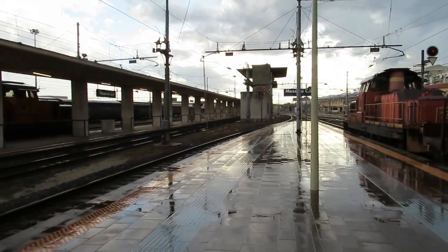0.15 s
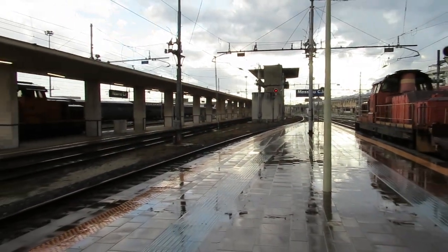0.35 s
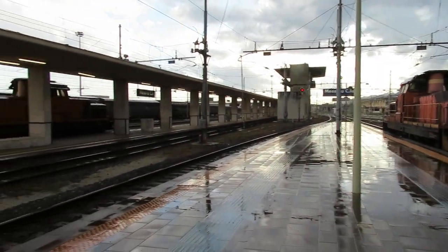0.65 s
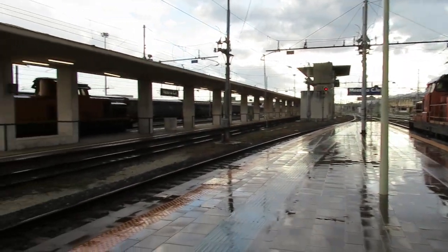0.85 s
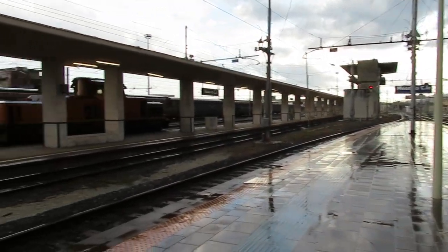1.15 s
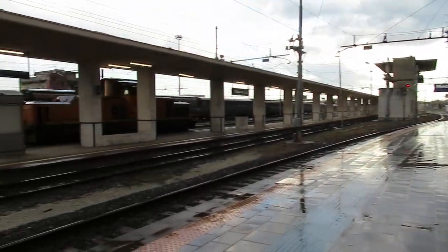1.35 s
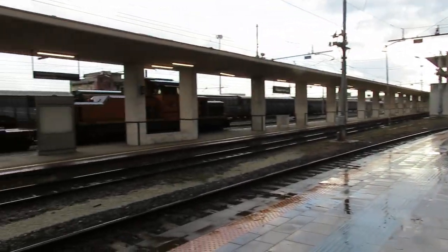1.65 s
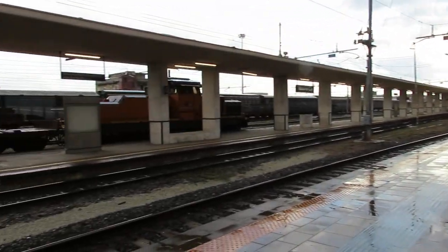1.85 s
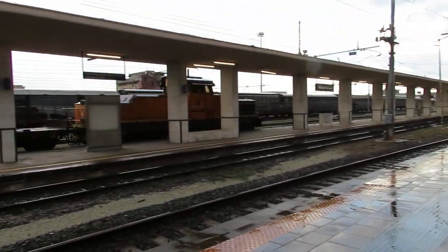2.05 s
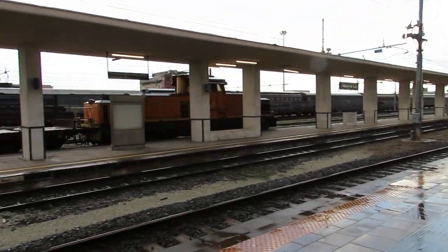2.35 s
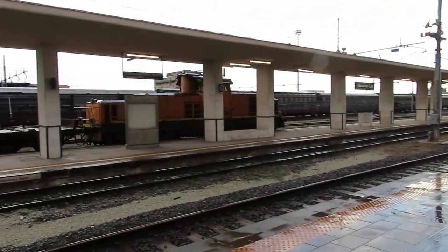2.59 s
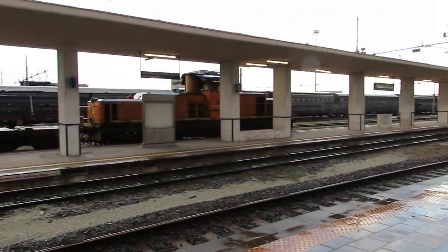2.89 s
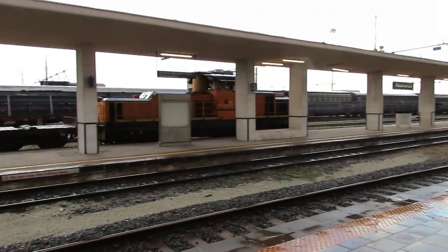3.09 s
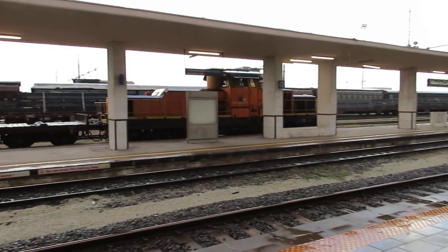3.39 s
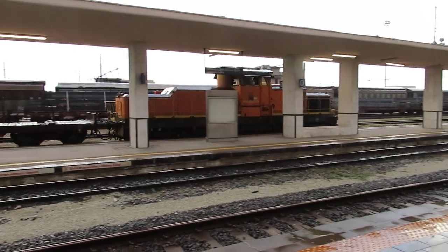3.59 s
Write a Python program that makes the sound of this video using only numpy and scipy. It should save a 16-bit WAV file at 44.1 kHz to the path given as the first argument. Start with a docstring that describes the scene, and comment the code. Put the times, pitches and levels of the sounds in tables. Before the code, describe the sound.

Heard in stereo from a station platform, a slow diesel locomotive rumbles steadily, with faint wheel squeaks, a light clink and a couple of rail thuds. After a second, a bright hiss of air starts, whistles faintly and dies down.

```python
"""A station platform, heard on two closely spaced microphones as a diesel shunter rolls slowly past
behind the pillars. Its exhaust drones on low orders of the engine cycle, over a broad roar and thin
gear and fan whines. A wheel squeals faintly, a coupling clinks, wheels thud over a rail joint.
About a second in, a valve opens and compressed air hisses out, whistles faintly and fades."""
import sys
import numpy as np
from scipy import signal
from scipy.fft import rfft, irfft, next_fast_len
from scipy.io import wavfile

SR = 44100
rng = np.random.default_rng(int(sys.argv[2]) if len(sys.argv) > 2 else 0)


def wrap_up_sound(samples):
    """Save the sound to the file named by the first command line argument, as 16-bit audio."""
    columns = np.atleast_2d(samples).T
    # keep every value between -1 and 1, then stretch to whole-number steps
    tamed = np.clip(columns, -1, 1)
    steps = np.round(tamed * 32767).astype(np.int16)
    wavfile.write(sys.argv[1], SR, steps)


N = 164493

CYCLE_HZ = 9.47   # engine cycles a second
VALVE_OPENS_S, VALVE_ATTACK_S = 1.062, 0.0079

# Short high chirps: wheel squeals near 5.2 kHz and whistles of escaping air near 6.2 kHz.
# Each row: start in seconds, length in seconds, centre pitch in Hz, level in dB.
CHIRPS = [(.02, .19, 5270, -48), (.33, .16, 5290, -51), (.74, .12, 5240, -47), (1.09, .06, 5120, -43),
          (1.22, .06, 5300, -43), (1.37, .06, 5320, -42), (1.06, .13, 6330, -45), (1.33, .1, 6170, -43),
          (1.5, .11, 6240, -43), (1.66, .11, 6230, -43)]
# The coupling's modes. Each row: pitch in Hz, relative level in dB, seconds to die by 60 dB.
COUPLING_MODES = [(5060, -1, .1), (5750, -6, .12), (5785, -1, .17)]
# Wheels over a rail joint. Each row: time in seconds, level in dB, pitch in Hz.
JOINT_THUDS = [(.345, -9.5, 311), (2.762, -13, 243)]

# The escaping air. Each row: time in seconds, relative level in dB, lift of the top octave in dB.
AIR_FLOW = [(1.08, -36, 4), (1.15, -35.5, 1), (1.19, -39.5, 4), (1.26, -38, 0), (1.38, -36, 2.5),
            (1.55, -36, 2), (1.7, -38, -3), (1.82, -35.5, 1.5), (1.92, -39, 8), (2.02, -33, 1.5),
            (2.08, -39.5, 7.5), (2.16, -33.5, -4), (2.25, -41.5, 7), (2.36, -37.5, 3), (2.45, -40, 6.5),
            (2.52, -45.5, 10), (2.54, -37, -1), (2.75, -42, 2.5), (2.9, -45, 3.5), (3.05, -48, 7),
            (3.2, -47.5, 5), (3.25, -51, 3), (3.33, -48.5, 3), (3.5, -42, -6), (3.73, -52, -1)]
# The hiss in the pair's mid (sum) and side (difference). Each row: frequency in Hz, relative level in dB.
AIR_MID = [(1470, -1.5), (2500, -7), (3020, -2), (3270, -5), (4420, -1), (6150, -0.5), (7530, 0),
           (11100, -7), (12500, -30.5), (13800, -46), (15000, -44)]
AIR_SIDE = [(1470, -39), (2500, -13), (3070, -9), (3370, -10), (4470, -12), (6170, -4), (10100, -1.5),
            (11300, 2), (13600, -2), (15600, -11)]
# How the hiss's side follows its mid. Each row: frequency in Hz, share from 0 to 1, phase in radians.
AIR_COHERENCE = [(2500, .3, 3.4), (4500, .4, 4.4), (6500, .8, 4.45), (10000, .7, 4.6), (13000, .1, 4.6)]
# Whistle in the jet. Each row: pitch in Hz, width in Hz, level against the hiss in dB.
AIR_WHISTLES = [(6330, 60, -20)]

# Gear and fan whines. Each row: first and last pitch in Hz, wander in Hz, first and last level in dB.
WHINES = [(395, 397, 3, -41, -41), (1087, 1087, 6, -41, -48), (1451, 1436, 1, -46.5, -44),
          (1474, 1478, 3, -54, -51)]
# The roar as the pillars shade it. Each row: time in seconds, relative bass and middle levels in dB.
ROAR_SHADING = [(0, -25, -27), (0.3, -25.5, -29), (0.6, -22.5, -27.5), (0.9, -19, -26.5),
                (1.2, -24.5, -28.5), (1.5, -22.5, -27), (1.75, -20, -28.5), (2, -22, -25.5),
                (2.2, -20, -27), (2.3, -19.5, -24.5), (2.4, -20.5, -26), (2.55, -21, -25.5),
                (2.7, -23.5, -24), (2.77, -17.5, -28), (2.84, -22, -26.5), (2.95, -22, -28),
                (3.2, -22.5, -29), (3.45, -22.5, -28), (3.73, -21.5, -28)]
# The roar's treble. Each row: time in seconds, relative level in dB.
ROAR_TREBLE = [(0.0, -32), (0.01, -32), (0.25, -31.5), (0.29, -35.5), (0.46, -32.5), (1.01, -33),
               (1.15, -30.5), (1.16, -32.5), (1.34, -33), (1.39, -30.5), (1.53, -35), (1.57, -29),
               (1.59, -35.5), (1.8, -34), (1.93, -29.5), (2.23, -32.5), (2.27, -30), (2.38, -30),
               (2.51, -32.5), (2.54, -30.5), (2.74, -31.5), (2.78, -31), (3.12, -35), (3.2, -33),
               (3.24, -37.5), (3.27, -33.5), (3.73, -35)]
# The roar in the pair's mid and side. Each row: frequency in Hz, relative level in dB.
ROAR_MID = [(25, -48), (40, -25), (52, -13), (75, -13.5), (100, -15), (135, -15), (240, -11.5), (300, -17),
            (428, -24), (560, -21), (742, -25), (1000, -29.5), (1110, -27), (1740, -34.5), (2400, -36.5),
            (3100, -36.5), (4630, -42.5), (5250, -41), (8030, -50), (9800, -57), (11000, -80),
            (15600, -105)]
ROAR_SIDE = [(18, -49), (30, -15), (263, -2.5), (468, -4.5), (675, -14), (1030, -4.5), (1110, -9),
             (3240, -14), (5330, -16.5), (8310, -22), (13700, -20), (15600, -49)]
# How the roar's side follows its mid. Each row: frequency in Hz, share from 0 to 1, phase in radians.
ROAR_COHERENCE = [(100, 0.2, 1.5), (350, 0.6, 2.2), (700, 0.3, 3.3), (1100, 0.74, 3.2), (2000, 0, 4.2),
                  (7000, .3, 4.3), (12000, .1, 4.4)]

# The two strong exhaust orders, swelling and fading as direct sound and echo meet.
# Each row: time in seconds, level of order 6 in dB, level of order 9 in dB.
STRONG_ORDERS = [(0, -17.5, -25), (.15, -16, -25), (.7, -18, -27), (.95, -17.5, -24), (1.2, -19.5, -21.5),
                 (1.4, -23, -22), (1.55, -22, -20), (1.75, -22, -24), (1.9, -25, -18), (2.05, -29, -17.5),
                 (2.25, -26, -17.5), (2.5, -17.5, -20.5), (2.75, -17, -20.5), (2.9, -16, -25),
                 (3.1, -15, -26), (3.35, -16, -31), (3.6, -13, -27), (3.73, -13.5, -26)]
# The weaker exhaust orders. Each row: multiple of the engine cycle, level in dB.
WEAK_ORDERS = [(4, -42), (5, -34), (7, -32), (8, -28), (10, -34), (11, -28.5), (12, -36), (15, -32),
               (18, -35)]


def amp(db):
    return 10 ** (np.asarray(db) / 20)


def rms_one(x):
    return x / np.sqrt(np.mean(x ** 2) + 1e-20)


def in_time(rows):
    times, *columns = np.transpose(rows)
    return [np.interp(np.arange(N) / SR, times, column) for column in columns]


def at_hz(rows, hz):
    freqs, *columns = np.transpose(rows)
    return [np.interp(np.log(hz), np.log(freqs), column) for column in columns]


def drift(rate_hz):
    """Smooth random wander with a spread of 1."""
    step, settle = 40, 2000   # audio samples per point, points for the filter to settle
    pole = np.exp(-2 * np.pi * step * rate_hz / SR)
    white = rng.standard_normal(N // step + settle + 2)
    slow = signal.lfilter([1], [1, -2 * pole, pole * pole], white)[settle:]
    return np.interp(np.arange(N) / step, np.arange(len(slow)), rms_one(slow - slow.mean()))


def tone(hz, wander_hz, rate_hz):
    """A sine whose pitch wanders at random; rms 1."""
    return np.sqrt(2) * np.sin(2 * np.pi * np.cumsum(hz + wander_hz * drift(rate_hz)) / SR)


def ring(start_s, hz, t60_s, attack_s=.002):
    """One struck mode: a dying sine."""
    age = np.maximum(np.arange(N) / SR - start_s, 0)
    return np.sin(2 * np.pi * hz * age) * amp(-60 * age / t60_s) * np.minimum(age / attack_s, 1)


def narrow_noise(hz, width_hz):
    """A thin band of noise around a pitch; rms 1."""
    phase = 2 * np.pi * np.cumsum(np.full(N, hz)) / SR
    return rms_one(drift(width_hz / 2) * np.cos(phase) + drift(width_hz / 2) * np.sin(phase))


def pair_noise(mid_colour, side_colour, coherence, band_db, side_db):
    """Noise at the two microphones, mid at rms 1; each octave follows band_db(hz) and wavers alone."""
    edges = 20 * 2. ** np.arange(11)
    white = rng.standard_normal((2, 2, N))
    noises = 0
    for k, (low, high) in enumerate(zip(edges, edges[1:])):
        octave = signal.butter(2, [low, high], "band", fs=SR, output="sos")
        level_db = band_db(np.sqrt(low * high)) + .8 * drift(10)
        noises = noises + amp(level_db) * signal.sosfilt(octave, white[k % 2])
    size = next_fast_len(N)
    common, separate = rfft(noises, size)
    hz = np.maximum(np.arange(len(common)) * SR / size, 1)
    share, phase = at_hz(coherence, hz)
    difference = share * np.exp(1j * phase) * common + np.sqrt(1 - share ** 2) * separate
    low_cut = np.minimum(hz / mid_colour[0][0], 1) ** 2
    mid = irfft(low_cut * amp(at_hz(mid_colour, hz)[0]) * common, size)[:N]
    side = irfft(low_cut * amp(at_hz(side_colour, hz)[0]) * difference, size)[:N]
    return rms_one(mid) + amp(side_db) * rms_one(side) * [[1], [-1]]


def arch(start_s, length_s):
    """A half-sine swell from silence to silence."""
    return np.sin(np.pi * np.clip((np.arange(N) / SR - start_s) / length_s, 0, 1))


def throb_db(order, depth):
    """A level that pulses `order` times per engine cycle."""
    return 20 * np.log10(1 + depth * np.sin(2 * np.pi * order * CYCLE_HZ * np.arange(N) / SR))


def high_hiss_burst(start_s=1.062, attack_s=.0079, hold_s=.2, fade_s=.1):
    """A short burst of very high hiss, about a second in."""
    age = np.arange(N) / SR - start_s
    band = signal.butter(4, (12800, 14600), "band", fs=SR, output="sos")
    hiss = rms_one(signal.sosfilt(band, rng.standard_normal(N)))
    envelope = np.clip(np.minimum(age / attack_s, 1 - (age - hold_s) / fade_s), 0, 1)
    return amp(-45) * envelope * hiss


def high_chirps(rise_hz_per_s=400):
    """Wheel squeals and whistles of escaping air: short, flickering notes that slide upward."""
    chirps = 0
    for start_s, length_s, hz, db in CHIRPS:
        level = amp(db + 5 * drift(40)) * arch(start_s, length_s) ** .5
        pitch = hz + rise_hz_per_s * (np.arange(N) / SR - start_s - length_s / 2)
        chirps += level * tone(pitch, wander_hz=55, rate_hz=30)
    return chirps


def brief_sounds(clink_s=.241, clink_db=-31.5):
    """Chirps, a coupling's clink and a rolling rasp a little to the left; rail joint thuds centred."""
    chirps = high_chirps()
    clink = sum(amp(clink_db + db) * ring(clink_s, hz, t60_s) for hz, db, t60_s in COUPLING_MODES)
    rasp = amp(-38) * arch(start_s=2.26, length_s=.15) * narrow_noise(2800, width_hz=500)
    thuds = sum(amp(db) * ring(start_s, hz, t60_s=.064) for start_s, db, hz in JOINT_THUDS)
    return (chirps + clink + rasp) * [[1.23], [.77]] + thuds


def whines():
    """Gears and fan: thin, wavering tones, stronger on the left microphone."""
    tones = 0
    for first_hz, last_hz, wander_hz, first_db, last_db in WHINES:
        level = amp(np.linspace(first_db, last_db, N) + 4 * drift(6.5))
        tones += level * tone(np.linspace(first_hz, last_hz, N), wander_hz, rate_hz=5.5)
    return tones * [[1.2], [.8]]


def air_jet(gain_db=3, top_from_hz=10000):
    """Compressed air, a bright hiss with a faint whistle: the valve snaps open, then the flow sags."""
    flow_db, top_db = in_time(AIR_FLOW)
    opening = np.clip((np.arange(N) / SR - VALVE_OPENS_S) / VALVE_ATTACK_S, 0, 1)
    flutter_db = .5 * drift(12)
    hiss = pair_noise(AIR_MID, AIR_SIDE, AIR_COHERENCE,
                      lambda hz: top_db * (hz > top_from_hz) + flutter_db, side_db=4)
    whistle = sum(amp(db) * narrow_noise(hz, width_hz) for hz, width_hz, db in AIR_WHISTLES)
    return opening * amp(flow_db + gain_db) * (hiss + whistle)


def engine_roar(level_db=-19.5):
    """Broad noise from behind the pillars; the bass chugs, the treble flickers and throbs with firing."""
    bass_db, middle_db = in_time(ROAR_SHADING)
    treble_db, = in_time(ROAR_TREBLE)
    # the offsets bring each curve to around 0 dB
    bass_db += 22 + throb_db(order=2, depth=.2)
    middle_db += 26.5
    treble_db += 32 + throb_db(order=3, depth=.11) + 1.2 * drift(16)

    def band_db(hz):
        return treble_db if hz > 1300 else middle_db if hz > 320 else bass_db

    return amp(level_db) * pair_noise(ROAR_MID, ROAR_SIDE, ROAR_COHERENCE, band_db, side_db=-18.5)


def exhaust(waver_db=2.5, waver_rad=.4):
    """The drone, alike on both microphones: sines on orders of the engine cycle; the weak ones waver."""
    cycle_phase = 2 * np.pi * CYCLE_HZ * np.arange(N) / SR
    sixth_db, ninth_db = in_time(STRONG_ORDERS)
    drone = amp(sixth_db) * np.sin(6 * cycle_phase)
    drone += amp(ninth_db) * np.sin(9 * cycle_phase + rng.uniform(0, 2 * np.pi))
    for order, db in WEAK_ORDERS:
        level = amp(db + waver_db * drift(2.1))
        phase = order * cycle_phase + waver_rad * drift(2.4) + rng.uniform(0, 2 * np.pi)
        drone += level * np.sin(phase)
    return np.sqrt(2) * drone


def scene():
    """The passing locomotive, heard from the platform."""
    return exhaust() + engine_roar() + whines() + air_jet() + high_hiss_burst() + brief_sounds()


def record(dry, cutoff_hz=15700):
    """Both microphone channels pass through a steep treble cut."""
    return signal.sosfilt(signal.ellip(12, .3, 60, cutoff_hz, fs=SR, output="sos"), dry)


dry = scene()
out = record(dry)
wrap_up_sound(out)
```